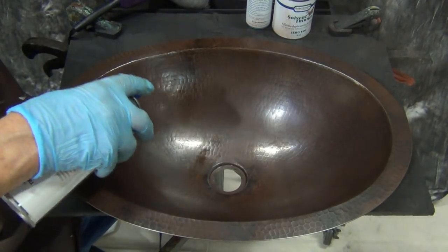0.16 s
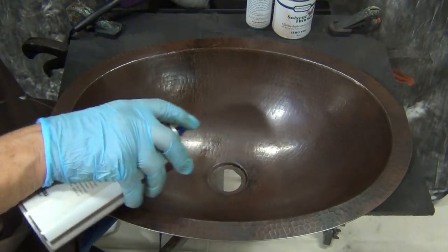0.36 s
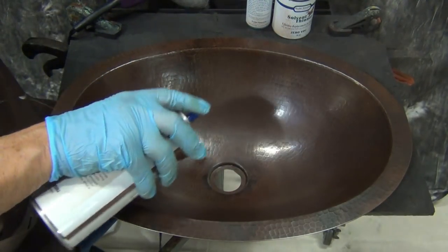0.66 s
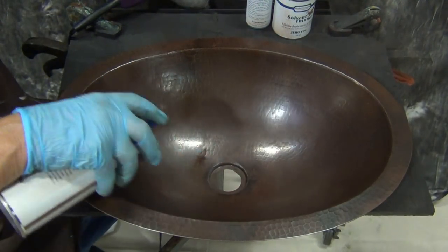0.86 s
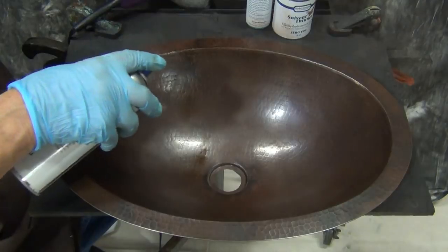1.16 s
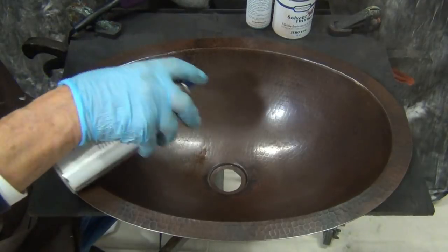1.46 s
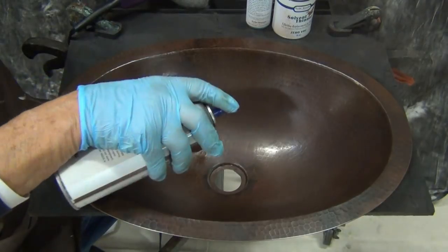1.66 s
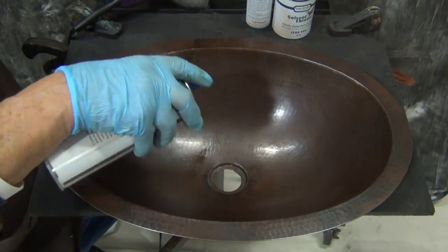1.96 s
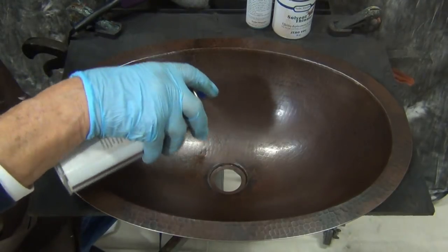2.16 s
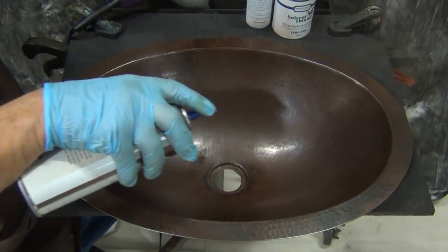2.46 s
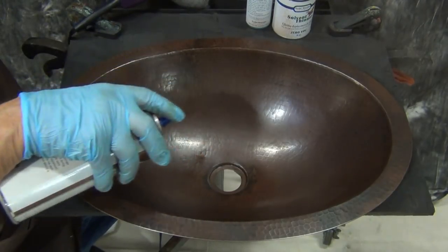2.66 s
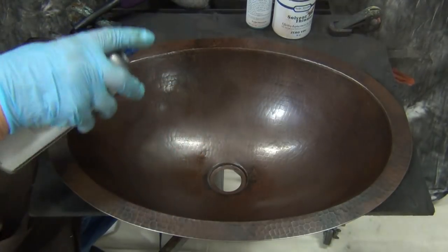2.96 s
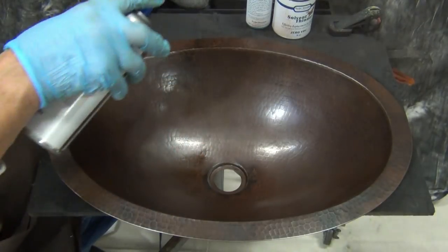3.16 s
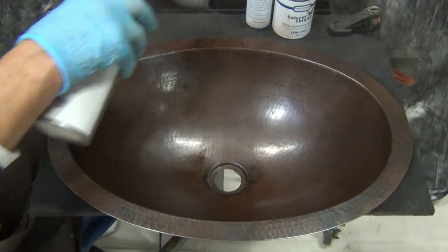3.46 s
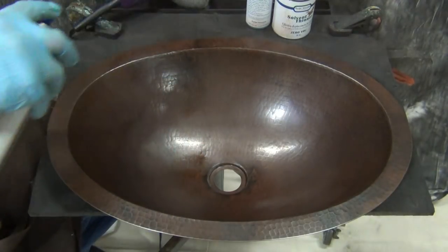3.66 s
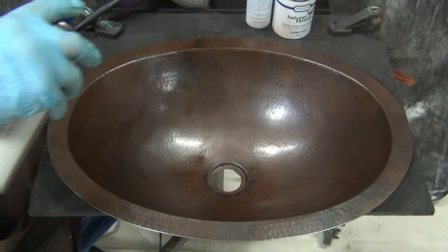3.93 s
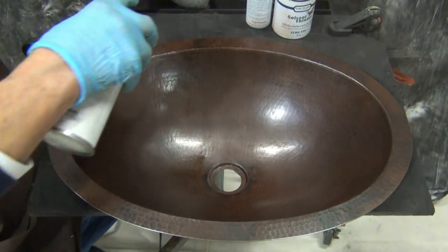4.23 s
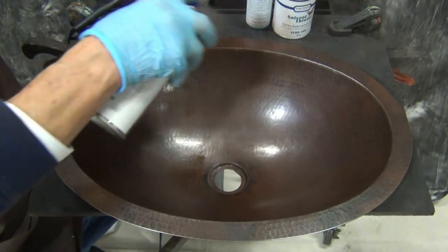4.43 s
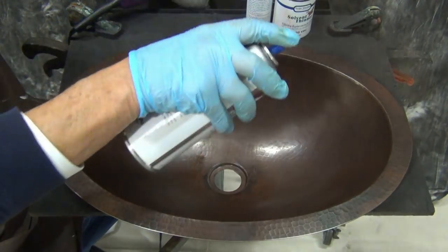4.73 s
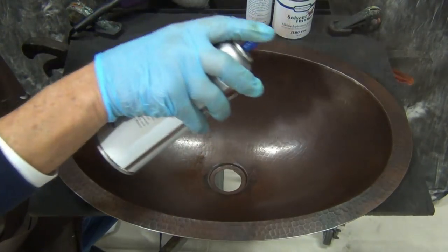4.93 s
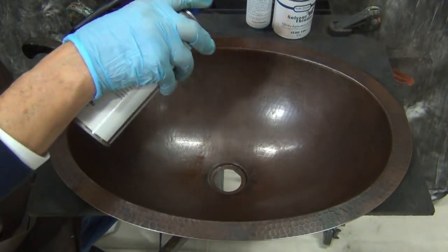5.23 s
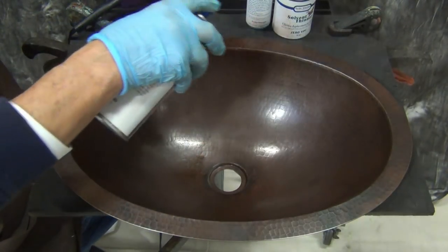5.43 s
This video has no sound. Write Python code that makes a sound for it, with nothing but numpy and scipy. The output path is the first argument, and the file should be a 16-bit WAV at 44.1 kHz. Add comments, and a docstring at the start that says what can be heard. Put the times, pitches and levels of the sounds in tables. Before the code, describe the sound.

Close by in a workshop, the mixing ball clacks inside an aerosol can, and the can sprays seven short, bright bursts into a metal sink. More clacks and faint swishes of liquid come between and during the bursts. On the third, the can scrapes the rim and the basin rings, fading under the remaining four sprays. A ventilation fan hums quietly throughout.

```python
"""A ventilation fan hums in a workshop. Close by, liquid swishes in an aerosol can and its mixing ball
clacks. The can starts misting seven short coats into a hammered metal sink, the hiss coloured by moving
echoes off the bowl, with more clacks and swishes along the way. After the second coat a glove creaks on
the button; during the third the can grazes the rim and sets the basin ringing. The ring dies away under
the last four coats, and the fan is left humming."""
import sys
import numpy as np
from scipy import signal
from scipy.fft import rfft, irfft
from scipy.io import wavfile
from scipy.ndimage import uniform_filter1d, map_coordinates

SR = 44100
rng = np.random.default_rng(int(sys.argv[2]) if len(sys.argv) > 2 else 0)


def wrap_up_sound(samples):
    """Save the sound to the file named by the first command line argument, as 16-bit audio."""
    columns = np.atleast_2d(samples).T
    # keep every value between -1 and 1, then stretch to whole-number steps
    tamed = np.clip(columns, -1, 1)
    steps = np.round(tamed * 32767).astype(np.int16)
    wavfile.write(sys.argv[1], SR, steps)


N = 246519
TIME = np.arange(N) / SR
FREQS = np.maximum(np.fft.rfftfreq(N, 1 / SR), 1)
CUTOFF_HZ = 15800

# Presses of the valve. Each row: opening and closing in seconds, base level in dB, extra sizzle in dB,
# swell as the aim turns in dB, nozzle resonance at the start and at the end in Hz,
# bowl echo delay at mid-press in ms, its growth as the hand sweeps in ms per second.
PRESSES = [(0.355, .576, -26.5, -1, 6.5, 7700, 7470, 1.38, 0.97),
           (.894, 1.1, -26.5, -3.5, -4.5, 7360, 7800, 1.31, -0.17),
           (1.533, 1.768, -26.5, 2, 5, 7750, 7500, 1.3, -0.27),
           (2.272, 2.45, -25, 2, 4, 7660, 7600, 1.36, 1.33),
           (2.878, 2.99, -27, -2.5, -3.5, 7970, 7400, 1.27, 0.5),
           (3.526, 3.757, -30, -3.5, 4.5, 7050, 8800, 1.24, -0.55),
           (4.516, 4.822, -27, -2.5, 4, 9250, 7400, 1.27, 1.33)]


def spray(open_s=0.0016, close_s=0.0033, sputter_db=0.72, impact_flutter_db=3.0):
    """Turbulent jet noise, gated by the valve, with resonances and echoes that shift as the hand moves."""
    # Colour of the jet. Each row: frequency in Hz, relative level in dB.
    jet_colour = [(500, -23), (800, -13.5), (1200, -15), (1600, -7.5), (2400, -11), (3200, -7.5),
                  (4000, -9), (4750, -5), (5700, -13.5), (6400, -3.5), (7300, -1), (9300, -3), (11000, -4),
                  (15500, -7)]
    # Resonances of nozzle and cupped hand. Each row: multiple of the lowest, gain, width in Hz.
    nozzle_modes = [(1, 1, 1000), (1.46, 0.98, 1200), (1.78, 0.88, 1200)]
    (impact_db, rush_db, hiss_db, sizzle_db), nozzle_hz, echo_ms = press_curves()
    valve = sum((1 + np.tanh((TIME - on) / (2 * open_s))) * (1 + np.tanh((off - TIME) / (2 * close_s))) / 4
                for on, off, *_ in PRESSES)
    jet = colour(stereo_noise(0.94), from_db(over_hz(jet_colour)))
    jet = jet + sum(gain * moving_resonance(jet, multiple * nozzle_hz, width_hz)
                    for multiple, gain, width_hz in nozzle_modes)
    jet = bowl_echoes(jet, echo_ms)
    edges_hz = [150, 2500, 6000, 9600, CUTOFF_HZ]
    levels_db = [impact_db + impact_flutter_db * drift(60), rush_db, hiss_db, sizzle_db]
    flow = sum(from_db(db) * colour(jet, (FREQS > low) & (FREQS <= high))
               for db, low, high in zip(levels_db, edges_hz, edges_hz[1:]))
    sputter = from_db(sputter_db * drift(250))  # droplets break up unevenly
    return valve * sputter * flow


def press_curves(opening_s=0.0086, closing_s=0.014):
    """The hand moves through each press: gliding band levels (dB), nozzle pitch (Hz), echo delay (ms)."""
    # The jet's impact, rush, hiss and sizzle. Each row: level within the press in dB, share of the swell,
    # change as the can cools in dB, change while the valve is half open in dB.
    jet_bands = [(-18, 0.1, 3.5, 10), (-5.5, 0.74, -0.5, 1), (-1, 0.88, -4, -3.5), (2, 1, -2.5, -3.5)]
    # The jet hits the bowl squarely and drums on it.
    # Each row: middle in seconds, half length in seconds, extra impact in dB.
    drumming = [(0.958, 0.065, 12), (3.674, 0.048, 10.5)]
    nearest = np.argmin([np.abs(TIME - (on + off) / 2) for on, off, *_ in PRESSES], axis=0)
    on, off, level_db, sizzle_db, swell_db, start_hz, end_hz, mid_ms, sweep = np.array(PRESSES)[nearest].T
    t = np.clip(TIME, on, off)
    along = (t - on) / (off - on)
    half_open = np.exp((on - t) / opening_s) + np.exp((t - off) / closing_s)  # the valve spits at each end
    impact, rush, hiss, sizzle = [
        level_db + db + (share * swell_db + cooling_db) * (along - .5) + spit_db * half_open
        for db, share, cooling_db, spit_db in jet_bands]
    drumming_db = sum(db * np.exp(-((TIME - s) / half_s) ** 2) for s, half_s, db in drumming)
    nozzle_hz = start_hz + (end_hz - start_hz) * along
    echo_ms = mid_ms + sweep * (t - (on + off) / 2)
    return (impact + drumming_db, rush, hiss, sizzle + sizzle_db), nozzle_hz, echo_ms


def bowl_echoes(jet, echo_ms, wander=0.056, wander_hz=2.94):
    """Each echo path shifts as the hand sweeps and wanders on its own, so the comb slides unevenly."""
    # Reflections off bowl and hand. Each row: multiple of the echo delay, signed gain.
    paths = [(.18, .28), (.47, .12), (.92, .2), (1, -.33), (1.12, .13), (1.4, -.18), (1.7, .12)]
    delay_s = uniform_filter1d(echo_ms, size=4000) / 1000
    out = jet
    for multiple, gain in paths:
        lag_s = multiple * delay_s * (1 + wander * drift(wander_hz))
        out = out + gain * np.array([map_coordinates(side, [(TIME - lag_s) * SR], order=3) for side in jet])
    return out


def mixing_ball(crack_db=-1, crack_t60=0.03, crack_top_hz=7000, focus_octaves=0.17, crest_db=10, size=8192):
    """Each hit is a short crack and the damped ring of the filled can; the spot struck picks the modes."""
    # Modes of the can's wall. Each row: frequency in Hz, relative level in dB, uncapped t60 in seconds.
    wall_modes = [(1540, -6, 0.09), (1745, 3, 0.039), (2300, -1.5, 0.046), (2800, -9, 0.13),
                  (3150, -5, 0.088), (3540, -1.5, 0.024), (4320, -12.5, 0.065), (4606, -3, 0.021),
                  (5040, -6.5, 0.035), (6720, -38, 0.049), (7140, 2, 0.09), (8240, -13, 0.0072),
                  (10000, 5, 0.024), (12400, -14, 0.012)]
    out, t = np.zeros((2, N + size)), TIME[:size]
    hz, mode_db, t60 = np.transpose(wall_modes)[:, :, None]
    t60 = np.minimum(t60, 190 / hz)  # the liquid stops any mode within 190 cycles
    for s, peak_db, spot_hz in ball_hits():
        favour = 1 / np.sqrt(1 + (np.log2(hz / spot_hz) / focus_octaves) ** 2)
        strength = favour * from_db(mode_db + rng.normal(0, 1.0, hz.shape)) * rng.choice([-1, 1], hz.shape)
        loaded_hz = hz * (1 + rng.normal(0, 0.019, hz.shape))  # the moving liquid detunes the wall
        ring = np.sum(strength * from_db(-60 * t / t60) * np.sin(2 * np.pi * loaded_hz * t), axis=0)
        noise = rng.standard_normal(size) + 0.63 * rng.standard_normal((2, size))
        crack = noise * from_db(crack_db - 60 * t / crack_t60)
        crack = band(crack, min(0.67 * spot_hz, crack_top_hz / 2), crack_top_hz, order=1)
        attack = 1 - np.exp(-t / 0.00015)
        hit = attack * (band(ring, 1100, 18000) + crack)
        at = int(s * SR)
        out[:, at:at + size] += from_db(peak_db - crest_db) * hit / np.std(hit[:, t < .005])
    return out[:, :N]


def ball_hits(rebound=.68, first_db=-8, step_db=-2.5, bounce_hz=2370, sag_hz=130):
    """The ball strikes and bounces, each bounce sooner and softer, sounding the wall's low modes."""
    # Strikes on the wall. Each row: time in seconds, rough peak in dB, pitch that the spot favours in Hz,
    # flight to the first bounce in seconds, number of bounces.
    strikes = [(.1438, -5.5, 4900, 0.032, 5), (.638, -11, 4070, 0.019, 3), (0.7105, -28, 3900, 0, 0),
               (1.2699, -25.5, 4000, 0, 0), (1.343, -32, 3870, 0, 0), (1.843, -14, 5050, 0, 0),
               (2.7664, -10.5, 3700, .0148, 4), (2.899, -17.5, 1820, 0.025, 1),
               (3.723, -14, 4400, 0.027, 1), (3.7653, -18.5, 2040, 0, 0)]
    for s, peak_db, spot_hz, flight_s, count in strikes:
        yield s, peak_db, spot_hz
        for k in range(round(count)):
            s += flight_s * rebound ** k
            yield s, peak_db + first_db + step_db * k, bounce_hz - sag_hz * k


def rim_graze(grain_db=0.5, ring_t60=0.32, ring_db=-1, rasp_db=-4, thud_db=-26, thud_t60=0.26, count=110):
    """The can thuds on the rim, then slips over the hammer dents, rasping and driving the basin's modes."""
    # Rubbing force. Each row: time in seconds, level in dB.
    force_curve = [(1.577, -37), (1.582, -12.5), (1.615, -16.5), (1.645, -20), (1.69, -21), (1.745, -25.5),
                   (1.775, -36), (1.8, -67)]
    # Colour of the rasp. Each row: frequency in Hz, relative level in dB.
    rasp_colour = [(200, -60), (550, -43), (740, 1.5), (1100, -8.5), (1500, -8.5), (1900, -0.5),
                   (2600, 5.5), (3300, -1.5), (4400, -8.5), (5300, -4), (5900, -6.5), (7400, -1.5),
                   (10000, -9), (16000, -30)]
    times, force_db = np.transpose(force_curve)
    force = from_db(np.interp(TIME, times, force_db)) * (TIME > times[0]) * (TIME < times[-1])
    grain = stereo_noise(0.94) * from_db(grain_db * drift(1300))
    slips = force * colour(grain, from_db(over_hz(rasp_colour)))
    hz = np.linspace(720, 9000, count) + rng.uniform(-33.5, 25.8, count)
    short_modes = resonances(hz, ring_t60 * np.sqrt(2000 / hz), rng.choice([-1, 1], count))
    ringing = colour(slips, short_modes) * np.std(slips)
    since = np.maximum(TIME - times[0], 0)
    thud = rms_one(band(stereo_noise(0.96), 133, 545))
    thud *= (since > 0) * from_db(thud_db - 60 * since / thud_t60)
    return from_db(rasp_db) * slips + from_db(ring_db) * ringing + thud + basin_ring(force)


def basin_ring(force, level_db=-1, treble_db=-3, beat_db=5.5):
    """The basin's long modes gather energy while the can rubs and ring on, beating slowly."""
    # Each row: frequency in Hz, relative level in dB, t60 in seconds.
    long_modes = [(811, -46, 3.38), (1039, -44, 4.4), (1121, -45, 3.09), (1213, -51, 5.0),
                  (1313, -40, 3.95), (1544, -52, 5.0), (1680, -50, 5.0), (1816, -37, 4.09),
                  (1922, -37, 0.63), (1962, -35, 3.34), (2071, -35, 0.37), (2233, -25, 0.74),
                  (2289, -37, 3.23), (2368, -33, 0.56), (2462, -32, 1.2), (2571, -38, 0.43),
                  (2609, -28, 0.31), (2644, -41, 3.09), (2800, -37, 0.33), (2836, -36, 1.17),
                  (3038, -40, 2.5), (3254, -26, 0.54), (3928, -40, 1.41), (4174, -38, 1.18),
                  (5231, -47, 2.06), (6428, -54, 4.01), (7078, -45, 1.82), (7417, -35, 0.92),
                  (8117, -35, 1.11), (8476, -47, 2.0)]
    out = basin_shimmer(force)
    for hz, db, t60 in long_modes:
        phase, beat_hz, pan_db = rng.uniform(0, 2 * np.pi), rng.uniform(2.03, 7), rng.normal(0, 1)
        gain = from_db(db + level_db + treble_db * (hz > 3100))
        beat = from_db(beat_db * np.sin(2 * np.pi * beat_hz * TIME + phase))
        pan = from_db([[pan_db], [-pan_db]])
        out += pan * gain * beat * build_up(force, t60) * np.sin(2 * np.pi * hz * TIME + phase)
    return out


def basin_shimmer(force, level_db=-43, db_per_octave=-4, uneven_db=3.5, t60=1.8, count=28):
    """A crowd of faint high modes of the basin outlasts the rubbing."""
    hz = np.linspace(3300, 9000, count) + rng.uniform(-92.5, 90, count)
    gain = from_db(db_per_octave * np.log2(hz / hz[0]) + rng.normal(0, uneven_db, count))
    phase = rng.uniform(0, 2 * np.pi, count) + rng.normal(0, 0.85, (2, count))
    spectrum = np.zeros((2, len(FREQS)), complex)
    spectrum[:, np.searchsorted(FREQS, hz)] = gain * np.exp(1j * phase)
    return from_db(level_db) * build_up(force, t60) * rms_one(irfft(spectrum, N))


def swishes(grain_db=3.0, width_hz=380, rustle_gain=0.06):
    """Liquid and ball slide along the wall: a grainy murmur around one of its modes, and a faint rustle."""
    # Each row: start and end in seconds, level in dB, pitch in Hz.
    slides = [(-0.015, 0.2, -44.5, 2150), (0.192, 0.264, -33, 1590), (0.625, 0.726, -38, 1930),
              (1.264, 1.46, -44, 1760), (1.823, 1.897, -29, 2040), (2.785, 2.83, -42, 2310),
              (2.857, 2.95, -38.5, 1860), (3.048, 3.158, -45.5, 2410), (3.697, 3.78, -35.5, 1890)]
    rub = stereo_noise(0.87) * from_db(grain_db * drift(125))
    rustle = rustle_gain * band(rub, 1100, 8300, order=1)
    out = 0
    for start, end, db, hz in slides:
        swell = np.sqrt(np.interp(TIME, [start, (start + end) / 2, end], [0, 1, 0]))
        murmur = band(rub, hz - width_hz / 2, hz + width_hz / 2, order=1)
        out += from_db(db) * swell * rms_one(murmur + rustle)
    return band(out, 1100, 14500)


def glove_creak(start_s=1.27, end_s=1.3, level_db=-40.5, uneven_db=4, ring_hz=10100, ring_t60=0.024):
    """The glove sticks and slips on the plastic button, which answers with thin ticks."""
    gaps = rng.uniform(.7, 1.3, 12) / 70  # about 70 slips a second
    times = start_s + np.cumsum(gaps) - gaps[0]
    strength = from_db(level_db + rng.normal(0, uneven_db, len(times)))
    slips = np.zeros(N)
    slips[(times * SR).astype(int)] = strength * (times < end_s)
    t = TIME[TIME < ring_t60]
    tick = from_db(-60 * t / ring_t60) * np.sin(2 * np.pi * ring_hz * t)
    return np.convolve(slips, tick)[:N]


def workshop_reverb(x, wet_db=-19, low_t60=0.57, high_t60=0.36, predelay_s=0.0081):
    """The room returns a faint diffuse tail whose treble dies first."""
    noise = stereo_noise(0.96)
    body = band(noise, 240, 4100) * from_db(-60 * TIME / low_t60)
    treble = .5 * band(noise, 2700, 11300) * from_db(-60 * TIME / high_t60)
    tail = ((body + treble) * (TIME > predelay_s))[:, :SR]
    tail /= np.sqrt(np.sum(tail ** 2) / 2)
    return from_db(wet_db) * signal.fftconvolve(x, tail, axes=1)[:, :N]


def fan(air_db=-50, fade_db=1.67):
    """A bed of moving air and wavering hum, easing slowly."""
    # Colour of the air. Each row: frequency in Hz, relative level in dB.
    air_colour = [(15, -40), (25, -14), (53, -9), (75, -15), (112, -8), (176, -10.5), (250, -5),
                  (335, -9.5), (404, -14), (475, -14.5), (903, -10.5), (2180, -19.5), (5280, -28.5),
                  (6540, -28), (15000, -32)]
    # Stereo image of the air. Each row: frequency in Hz, left-right likeness from 0 to 1.
    likeness = [(30, 0.29), (80, 0.99), (300, 0.63), (2000, 0.71), (12000, 0.47)]
    # The rumble leans right. Each row: frequency in Hz, left minus right in dB.
    balance = [(30, -9), (60, -19.5), (125, -12), (250, 0.5)]
    # Fan hum and a thin electrical whine. Each row: frequency in Hz, mid-scene level in dB, waver in dB.
    hum_tones = [(99, -61, 2.5), (113, -56, 2.5), (329, -65, 2), (360, -64, 2), (5157, -75, 1),
                 (5276, -77, 1), (5399, -78, 1), (5997, -77, 1), (15735, -65, 1)]
    lean = from_db(over_hz(balance) / 2 * [[1], [-1]])
    air = from_db(air_db) * colour(stereo_noise(over_hz(likeness)), lean * from_db(over_hz(air_colour)))
    hum = 0
    for hz, db, waver_db in hum_tones:
        amplitude = np.sqrt(2) * from_db(db + waver_db * drift(22))
        hum += amplitude * np.sin(2 * np.pi * hz * TIME + 1.1 * drift(3.4))
    return (air + hum) * from_db(fade_db * (0.5 - TIME / TIME[-1]))


def build_up(force, t60):
    """Envelope of a mode that gathers energy from a rubbing force and leaks it again; peaks at one."""
    energy = signal.lfilter([1], [1, -from_db(-120 / (t60 * SR))], force ** 2 + 1e-18)
    return np.sqrt(energy / energy.max())


def moving_resonance(x, hz, width_hz, size=256):
    """A resonance of gain one whose centre follows a curve."""
    r = np.exp(-np.pi * width_hz / SR)
    zeros = np.array([1, 0, -1]) * (1 - r * r) / 2
    out, state = np.zeros_like(x), np.zeros((2, 2))
    for i in range(0, N, size):
        poles = [1, -2 * r * np.cos(2 * np.pi * hz[i] / SR), r * r]
        out[:, i:i + size], state = signal.lfilter(zeros, poles, x[:, i:i + size], zi=state)
    return out


def resonances(hz, t60, gain):
    """Frequency response of decaying modes in parallel, each peaking at its gain."""
    return sum(g / (1 + 2j * np.pi * (FREQS - f) * t / np.log(1000)) for f, t, g in zip(hz, t60, gain))


def stereo_noise(likeness):
    """White noise whose two channels are partly alike."""
    alike = np.clip(likeness, 0, 1)
    mid, side = rfft(rng.standard_normal((2, N)))
    return irfft(np.sqrt(1 + alike) * mid + np.sqrt(1 - alike) * side * [[1], [-1]], N)


def drift(rate_hz):
    """Random wobble, mostly slower than the rate, with an rms of one."""
    return colour(rng.standard_normal(N), 1 / (1 + (FREQS / rate_hz) ** 2))


def colour(x, gain):
    """Shape a sound's spectrum and scale it to an rms of one."""
    return rms_one(irfft(rfft(x) * gain, N))


def band(x, low_hz, high_hz, order=2):
    """Butterworth band-pass."""
    sos = signal.butter(order, [low_hz, min(high_hz, .47 * SR)], "band", fs=SR, output="sos")
    return signal.sosfilt(sos, x)


def over_hz(points):
    """Spread (Hz, value) points over every frequency."""
    hz, value = np.transpose(points)
    return np.interp(np.log(FREQS), np.log(hz), value)


def rms_one(x):
    """Scale to an rms of one."""
    return x / np.sqrt(np.mean(x ** 2) + 1e-20)


def from_db(db):
    """Decibels to gain."""
    return 10 ** (np.asarray(db) / 20)


def scene():
    """The can and the basin close by, the room and its fan behind."""
    close = spray() + glove_creak() + mixing_ball() + swishes() + rim_graze()
    return close + workshop_reverb(close) + fan()


def record(dry):
    """A steep low-pass takes off the very top."""
    return signal.sosfilt(signal.ellip(12, .1, 80, CUTOFF_HZ, fs=SR, output="sos"), dry)


dry = scene()
out = record(dry)
wrap_up_sound(out)
```